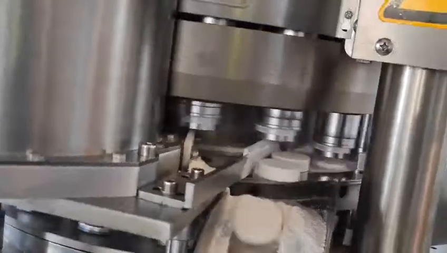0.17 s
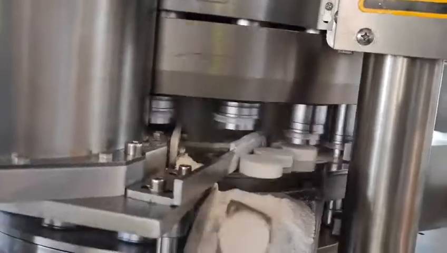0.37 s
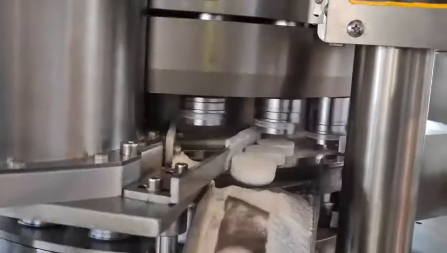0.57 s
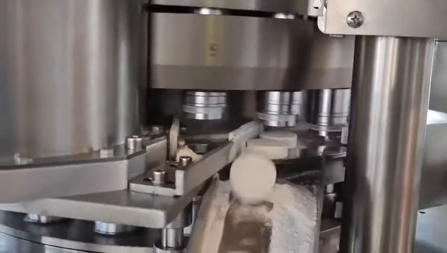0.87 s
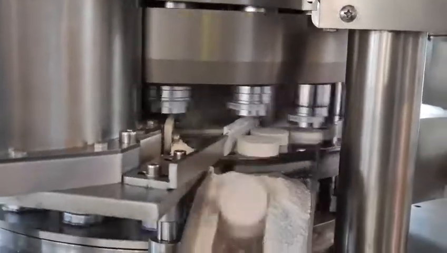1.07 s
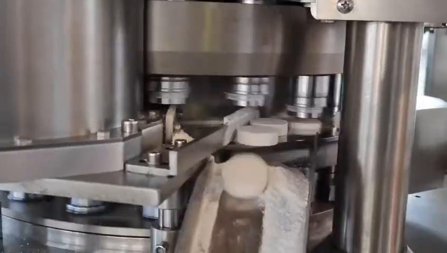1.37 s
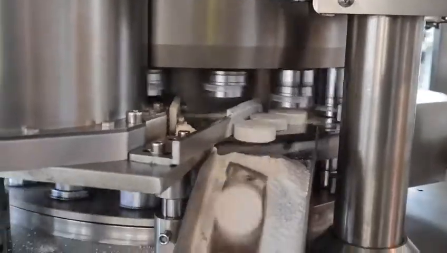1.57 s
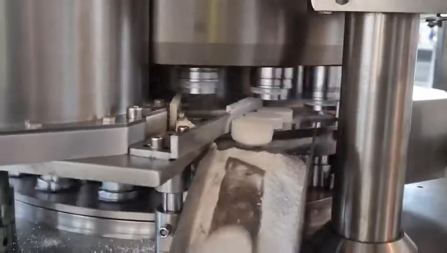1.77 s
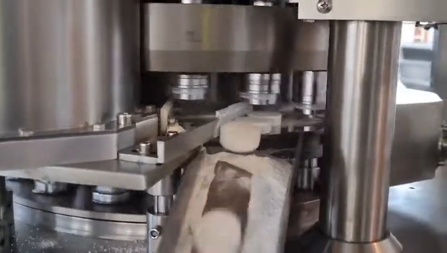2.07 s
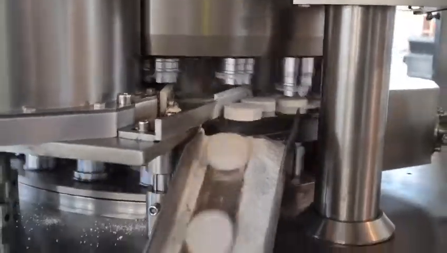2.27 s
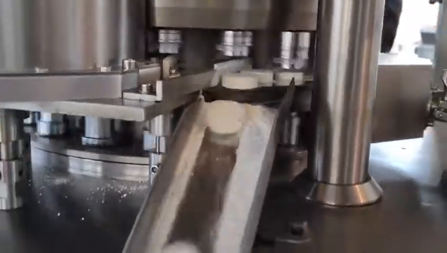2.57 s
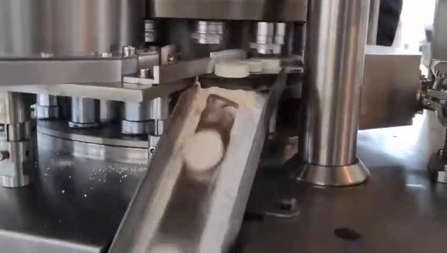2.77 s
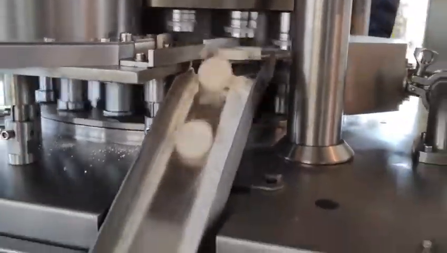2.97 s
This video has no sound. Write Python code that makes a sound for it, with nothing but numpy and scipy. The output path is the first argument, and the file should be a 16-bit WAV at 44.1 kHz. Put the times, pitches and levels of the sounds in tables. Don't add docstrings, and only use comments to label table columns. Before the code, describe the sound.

A rotary tablet press clatters. Silence until a tiny tick at 0.14 s, then sound cuts in abruptly, left slightly before right, with a soft bump. Steady motor roar carries cycles every 0.15 s: hollow clunk, bright clack, ringing clank, scrapy tick, unevenly loud. Dull distant thumps near 0.6, 1.4, 2.2, 3.07 s; faint hisses at 0.7, 1.5, 2.4 s. Close, slightly crushed phone sound, short hall reverberation.

```python
import sys
import numpy as np
from scipy import signal
from scipy.fft import rfft, irfft, next_fast_len
from scipy.io import wavfile
from scipy.ndimage import uniform_filter1d

SR = 44100
rng = np.random.default_rng(int(sys.argv[2]) if len(sys.argv) > 2 else 0)


def makeup_ratio(level_db):
    decades = np.asarray(level_db, float) / 20
    return 10 ** decades


def unload_audio(sound):
    columns = np.transpose(np.atleast_2d(sound))
    steps = np.round(np.clip(columns, -1, 1) * 32767)
    wavfile.write(sys.argv[1], SR, steps.astype(np.int16))


N = 138033
M = next_fast_len(N + 4096)
HZ = np.maximum(np.arange(M // 2 + 1) * SR / M, 1)
T = np.arange(M) / SR
SPAN = np.arange(int(0.3 * SR)) / SR
SIDES = np.array([[1], [-1]])

# frequency in Hz, level in dB, t60 in s.
DROP_MODES = [(1180, -6.5, 0.091), (2434, 0.5, 0.04), (2764, -3, 0.043), (3070, -6.5, .04),
              (5044, -5.5, 0.045), (8060, -4.5, 0.025)]


def curve(points):
    hz, value = np.array(points).T
    return np.interp(np.log(HZ), np.log(hz), value)


def unit(x):
    return x / np.sqrt(np.mean(x ** 2))


def walk(rate):
    hold = int(SR / rate)
    steps = np.repeat(rng.standard_normal(M // hold + 1), hold)
    return 1.435 * uniform_filter1d(uniform_filter1d(steps, hold), hold)[:M]


def pair(envelope, response):
    # frequency in Hz, share of the sound alike left and right.
    coherence = [(30, .6), (130, 1), (300, 0.97), (700, 1), (1400, 0.16), (3000, 0.09)]
    gain = response / np.sqrt(np.mean(abs(response) ** 2))
    mid, side = rfft(rng.standard_normal((2, M)) * envelope) * gain
    alike = np.clip(curve(coherence), 0, 1)
    return irfft(mid * np.sqrt((1 + alike) / 2) + side * np.sqrt((1 - alike) / 2) * SIDES, M)


def ring(modes):
    return sum(makeup_ratio(db) / (np.log(1000) / t60 + 2j * np.pi * (HZ - f)) for f, db, t60 in modes)


def band(hz, width):
    return 1 / (1 + 1j * (HZ - hz ** 2 / HZ) / width)


def blows(times, dbs, rise_s, fall_s):
    env = np.zeros(M + len(SPAN))
    shape = np.minimum(SPAN / rise_s, 1) * np.exp(-SPAN / fall_s)
    for s, db in zip(times, dbs):
        i = int((s - rise_s) * SR)
        env[i:i + len(SPAN)] += makeup_ratio(db) * shape
    return env[:M]


def strike(times, dbs, modes, soft_hz, spread=1):
    detune, uneven_db = 0.015, 3
    out = np.zeros(M + len(SPAN))
    hz, mode_db, t60 = np.array(modes).T[:, :, None]
    chance = spread * rng.standard_normal((len(times), 2, len(modes), 1))
    for s, db, (shift, weight) in zip(times, dbs, chance):
        i = int(s * SR)
        decay = makeup_ratio(db + mode_db + uneven_db * weight - 60 * SPAN / t60)
        tone = np.cos(2 * np.pi * hz * (1 + detune * shift) * SPAN)
        out[i:i + len(SPAN)] += np.sum(decay * tone, axis=0)
    return irfft(rfft(out[:M]) / (1 + 1j * HZ / soft_hz) ** 2, M)


def station(table, modes, strike_db, ring_db, crack_db, treble_db, ring_s, crack_s, treble_s, rise_s, bass=False):
    # frequency in Hz, level in dB per Hz.
    crack_colour = [(200, -12.5), (600, -5.5), (1500, -6), (2800, -1.5), (5000, -12), (8000, -13.5),
                    (9500, -21), (16000, -17.5)]
    rows = np.array(table).T
    times, peak_db, treble = rows[:3]
    mode_db = peak_db + (rows[3] if bass else 0)
    ringing = makeup_ratio(ring_db) * pair(blows(times, mode_db, rise_s, ring_s), ring(modes))
    out = ringing + strike(times, mode_db + strike_db, modes, 4500)
    rattle = makeup_ratio(3 * walk(400))
    colour = makeup_ratio(curve(crack_colour))
    low = 1 / (1 + (HZ / 4200) ** 4)
    body_env = blows(times, peak_db, rise_s, crack_s) * rattle
    treble_env = blows(times, peak_db + treble, rise_s / 2, treble_s) * rattle
    out = out + makeup_ratio(crack_db) * pair(body_env, colour * np.sqrt(low))
    return out + makeup_ratio(treble_db) * pair(treble_env, colour * np.sqrt(1 - low))


def roar():
    # frequency in Hz, level in dB per Hz.
    roar_colour = [(22, -13.5), (80, -8), (399, -8.5), (2460, -10.5), (7950, -28), (9400, -42.5),
                   (12100, -32), (16000, -41)]
    # frequency in Hz, width in Hz, level in dB.
    frame_modes = [(121.6, 15.6, -41), (297.3, 18, -35.5), (399.4, 38, -33), (543, 8, -55),
                   (675, 55, -46.5), (781.6, 13, -35.5)]
    swell, noise = walk(2.915), 0
    colour = makeup_ratio(curve(roar_colour))
    for hz in 30 * 2.0 ** np.arange(10):
        octave = np.cos(np.clip(np.log2(HZ / hz), -1, 1) * np.pi / 2) * colour
        flicker = makeup_ratio(2.0 * swell + 2.35 * walk(15))
        noise = noise + np.sqrt(np.mean(octave ** 2)) * pair(flicker, octave)
    frame = sum(pair(makeup_ratio(db + 2.3 * walk(8.32)), band(f, w)) for f, w, db in frame_modes)
    return makeup_ratio(-20) * unit(noise) + frame


def punch_pull():
    # time in s, peak in dB, relative treble in dB, relative bass in dB.
    pulls = [(0.157, -17, 3.5, -20), (0.475, -6, -4.5, -7), (0.6384, -13, -6, -0.5), (0.779, -23, 9, 5.5),
             (0.9194, -21, 6.5, -1), (1.072, -10.5, -2, -17), (1.2295, -8, 0, -16),
             (1.3784, -11.5, 3.5, -3), (1.5098, -14, 0.5, -11), (1.6574, -9.5, 0, -5),
             (1.8094, -12, 2, -0.5), (1.9684, -20.5, 8, 0), (2.1121, -18, 3, -7), (2.2625, -14.5, 2.5, -7),
             (2.3991, -7.5, 4.5, -31), (2.5466, -10.5, -3.5, -2.5), (2.7145, -11.5, -1, -12),
             (2.853, -10, -2, -27), (3.0017, -11.5, -2, -3.5)]
    # frequency in Hz, level in dB, t60 in s.
    pull_modes = [(783, 0.5, 0.21), (833, 6.5, 0.066), (1077, -5.5, 0.39)]
    return station(pulls, pull_modes, strike_db=-10, ring_db=0, crack_db=-2.5, treble_db=-7.0,
                   ring_s=0.0092, crack_s=0.017, treble_s=0.02, rise_s=0.0024, bass=True)


def loose_ticks():
    # time in s, peak in dB, relative treble in dB.
    ticks = [(.182, -16, -10), (.4463, -11, 1.5), (.6294, -8.5, -10), (.7035, -11, -14), (.8095, -9, 8.5),
             (1.9758, -11.5, -4), (2.1265, -12, -2.5), (2.1878, -12, -0.5), (2.339, -13, -3),
             (2.415, -10.5, -4), (1.411, -14.5, -4), (1.53, -10.5, 8), (2.778, -8.5, -2)]
    return station(ticks, DROP_MODES, strike_db=-5, ring_db=-5, crack_db=-0.69, treble_db=-6.5,
                   ring_s=0.0049, crack_s=0.0066, treble_s=0.0044, rise_s=0.001)


def punch_drop():
    # time in s, peak in dB, relative treble in dB.
    drops = [(0.2166, -10.5, -1.5), (0.3543, -7, -4), (0.5112, -9.5, -0.5), (0.6595, -6, 0),
             (0.7975, -12, 1.5), (0.9561, -6.5, -5.5), (1.1025, -7, -1.5), (1.2518, -9.5, -2.5),
             (1.4015, -8.5, -2.5), (1.5449, -8, 1), (1.6984, -7.5, -3.5), (1.845, -7, 1.5),
             (1.9878, -9, -2), (2.142, -10.5, 1), (2.2855, -12, 3.5), (2.436, -10.5, 1.5),
             (2.582, -9.5, -1.5), (2.7335, -10.5, 3.5), (2.8779, -10.5, 3.5), (3.0255, -4.5, -6)]
    return station(drops, DROP_MODES, strike_db=-6, ring_db=0.28, crack_db=-1.7, treble_db=-2.5,
                   ring_s=0.0075, crack_s=0.016, treble_s=0.011, rise_s=0.0063)


def roller_press():
    # time in s, peak in dB, relative treble in dB, relative bass in dB.
    presses = [(0.2432, -11.5, 0, -9.5), (0.394, -13, -8, -5.5), (0.552, -9, -12, -9.5),
               (0.6968, -7, 5, -12), (0.846, -6, -4.5, -20.5), (0.98, -8.5, 1.5, -18.5),
               (1.1291, -6, 1, -19), (1.2965, -8, -0.5, -14), (1.4355, -8.5, -0.5, -13.5),
               (1.5801, -11, -2, -15), (1.738, -10, -2, -11.5), (1.8748, -6.5, 1, -13),
               (2.0251, -10, -4.5, -8), (2.181, -8.5, 5, -9), (2.333, -13.5, 2.5, -7),
               (2.4757, -7.5, -13, -12), (2.6245, -14, 6, -6.5), (2.773, -10, -9.5, -29),
               (2.9091, -8, -3, -34), (3.0586, -9.5, -2.5, -14.5)]
    # frequency in Hz, level in dB, t60 in s.
    high_modes = [(1788, -1.5, 0.06), (1901, 1.5, 0.094), (2038, -4, 0.07), (2295, -6, 0.11),
                  (2640, -2.5, 0.044), (4120, -12.5, 0.02)]
    low_modes = [(388, -1.5, 0.3), (435.2, -3.5, 0.12), (545, -4.5, 0.11), (658, -1, 0.1), (782, -11, 0.25),
                 (870.6, -6.5, 0.36)]
    high = station(presses, high_modes, strike_db=-10, ring_db=-1, crack_db=-4.5, treble_db=-9.5,
                   ring_s=0.01, crack_s=0.014, treble_s=0.008, rise_s=0.0025)
    low = station(presses, low_modes, strike_db=-0.54, ring_db=0, crack_db=-12.5, treble_db=-22.5,
                  ring_s=0.026, crack_s=0.033, treble_s=0.0081, rise_s=0.0023, bass=True)
    return high + low


def frame_knocks():
    # time in s, peak in dB, pitch in Hz.
    knocks = [(0.848, -13, 412), (.986, -14.5, 429), (1.131, -18, 423), (1.298, -15, 464),
              (1.435, -16, 388), (1.674, -18.5, 293), (1.702, -11.5, 416), (1.738, -16, 387),
              (1.823, -13.5, 382), (1.876, -11.5, 400), (2.029, -16.5, 390), (2.332, -17, 394),
              (.26, -16, 403), (1.095, -19, 268)]
    return sum(strike([s], [db], [(f, 0, 0.12), (1.09 * f, -5, 0.09)], 990, spread=0) for s, db, f in knocks)


def tablet_eject():
    # time in s, peak in dB, relative treble in dB.
    ejects = [(0.2933, -16, 1), (0.4592, -9, -6), (0.593, -13, -8), (0.7405, -13.5, -1),
              (0.8842, -14, -0.5), (1.036, -14.5, 1), (1.185, -16, 3), (1.331, -13, 2), (1.479, -16, 4.5),
              (1.6284, -13, 3.5), (1.776, -11, 0.5), (1.922, -13.5, 0.5), (2.0753, -13.5, 1.5),
              (2.2199, -16, 3.5), (2.3717, -13, -15), (2.517, -15.5, -3), (2.6618, -16.5, 0),
              (2.822, -16.5, 2.5), (2.962, -20, 2.5), (3.098, -15.5, -2)]
    # frequency in Hz, level in dB, t60 in s.
    eject_modes = [(2140, -5, 0.08), (3315, -4, 0.022), (4170, -5, 0.053), (5700, -4, 0.041),
                   (6770, -12.5, 0.014)]
    return station(ejects, eject_modes, strike_db=-23, ring_db=-4.5, crack_db=-3.5, treble_db=-5,
                   ring_s=0.012, crack_s=0.02, treble_s=0.015, rise_s=0.0026)


def neighbour():
    # time in s, peak in dB, pitch in Hz.
    thumps = [
        (0.604, -12, 270.8),
        (1.397, -20, 271),
        (2.231, -15, 291.3),
        (3.07, -18, 318),
    ]
    out = 0
    for s, db, f in thumps:
        modes = [(f, 0, 0.25), (1.11 * f, -4, 0.2), (1.4 * f, -3, 0.2)]
        out = out + strike([s], [db + 2.5], modes, 470, spread=0)
    return out


def air():
    # start in s, length in s, level in dB.
    puffs = [
        (0.722, .245, -30),
        (1.467, .405, -29),
        (2.386, 0.11, -27),
    ]
    # frequency in Hz, width in Hz, level in dB.
    hiss_bands = [(11700, 1600, -0.5), (15180, 1000, 5.5)]
    env = sum(makeup_ratio(db) * np.clip(np.minimum((T - s) / 0.0053, (s + d - T) / 0.016), 0, 1) for s, d, db in puffs)
    return pair(env * makeup_ratio(0.68 * walk(30.1)), sum(makeup_ratio(db) * band(f, w) ** 2 for f, w, db in hiss_bands))


def hall(spectrum):
    t60_s, level_db, delay_s = 0.45, -8.5, 0.008
    tail = rng.standard_normal((2, M)) * makeup_ratio(-60 * T / t60_s) * (T > delay_s)
    return spectrum * rfft(tail) / np.sqrt(np.sum(tail[0] ** 2)) * makeup_ratio(level_db) / (1 + 1j * HZ / 4000)


def scene():
    # frequency in Hz, left minus right in dB.
    port_balance = [(30, -3.5), (250, 0.1), (500, -2.5), (1800, 1.5), (4000, -4), (8000, -6.5),
                    (12000, -1.5)]
    lead_s = 0.00018
    steady = roar()
    hits = punch_pull() + loose_ticks() + punch_drop() + roller_press() + frame_knocks() + tablet_eject()
    hits = hits + neighbour()
    ports = makeup_ratio(SIDES * curve(port_balance) / 2) * np.exp(SIDES * 1j * np.pi * HZ * lead_s)
    return irfft((rfft(hits + air() + steady) + hall(rfft(hits))) * ports, M)[:, :N]


def starve(x):
    # frequency in Hz, step in dB against the nearby level.
    coarse_steps = [(1200, -14), (4000, -6), (8000, -3), (8700, 6), (14500, 7), (15100, 13), (15600, 15)]
    n, patch_bins, top_hz = 1024, 24, 15700
    k = np.arange(n) + 0.5
    window = signal.windows.kaiser_bessel_derived(2 * n, 4 * np.pi)[:, None]
    phase = np.pi / n * (np.arange(2 * n)[:, None] + 0.5 + n / 2) * k
    basis = window * np.sqrt(2 / n) * np.cos(phase)
    blocks = np.pad([x[0] + x[1], x[0] - x[1]], ((0, 0), (n, 2 * n - N % n))).reshape(2, -1, n)
    lines = np.concatenate([blocks[:, :-1], blocks[:, 1:]], axis=2) @ basis
    hz = k * SR / 2 / n
    near = np.sqrt(uniform_filter1d(np.mean(lines ** 2, axis=0), 180, axis=1)) + 1e-9
    near = near ** 0.6 * np.median(near, axis=0) ** 0.4
    chance = rng.standard_normal((lines.shape[1], n // patch_bins + 1))
    chance = np.repeat(chance, patch_bins, axis=1)[:, :n]
    step = near * makeup_ratio(np.interp(hz, *np.array(coarse_steps).T) + 4 * chance)
    rounded = np.sign(lines) * np.floor(abs(lines) / step + 0.4) * step
    kept = np.where(hz < coarse_steps[0][0], lines, rounded) * (hz < top_hz)
    out = kept @ basis.T
    mid, side = (out[:, :-1, n:] + out[:, 1:, :n]).reshape(2, -1)[:, :N] / 2
    return np.array([mid + side, mid - side])


def low_pass(x):
    return signal.sosfilt(signal.butter(12, 16760, fs=SR, output="sos"), x)


def record(dry):
    # time in s, gain in dB.
    gain_curve = [(.147, 0), (.2, -2), (.3, 2), (.45, 1.5), (1.5, 0.5), (3.13, 1.5)]
    # time in s, extra gain of the right side in dB.
    right_trail = [(.16, -12.5), (.25, -4.5), (.45, -2), (.7, -1)]
    wake_s = np.array([[0.1465], [0.1587]])
    step_db, step_tau_s = [[-26], [-14.5]], [[0.014], [0.06]]
    tick_db, tick_s, tick_rise_s = -20.5, 0.1408, 0.0006
    t = T[:N]
    late = np.array([0 * t, np.interp(t, *np.array(right_trail).T)])
    x = np.tanh(dry * makeup_ratio(np.interp(t, *np.array(gain_curve).T) + late)) * (t > wake_s)
    awake = np.maximum(t - wake_s, 0)
    first_stair = makeup_ratio(-6) * (awake < 0.007)
    sag = makeup_ratio(step_db) * (np.exp(-awake / step_tau_s) + first_stair)
    x = np.where(awake > 0, starve(uniform_filter1d(x, size=2)) - sag, 0)
    x[0] += makeup_ratio(tick_db) * np.clip(1 + (t - tick_s) / tick_rise_s, 0, 1) * (t < tick_s)
    return low_pass(x)


dry = scene()
out = record(dry)
unload_audio(out)
```